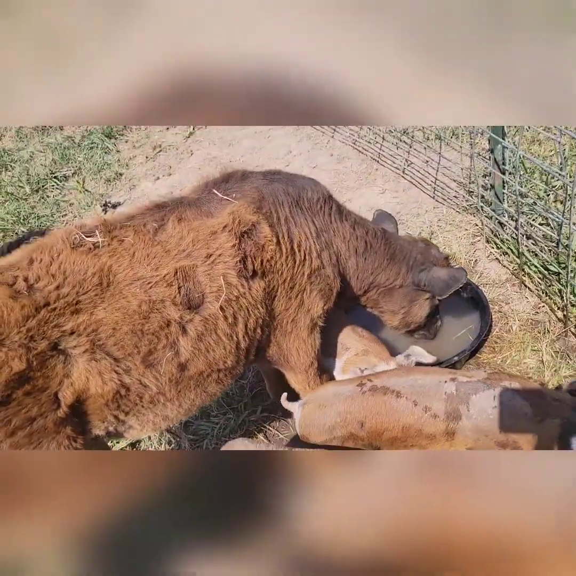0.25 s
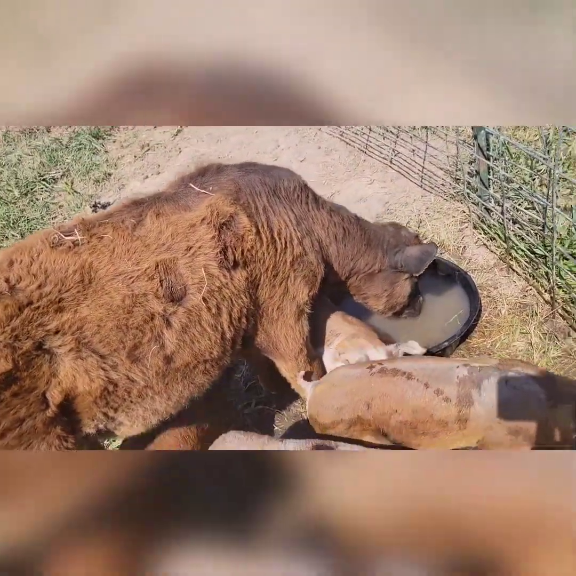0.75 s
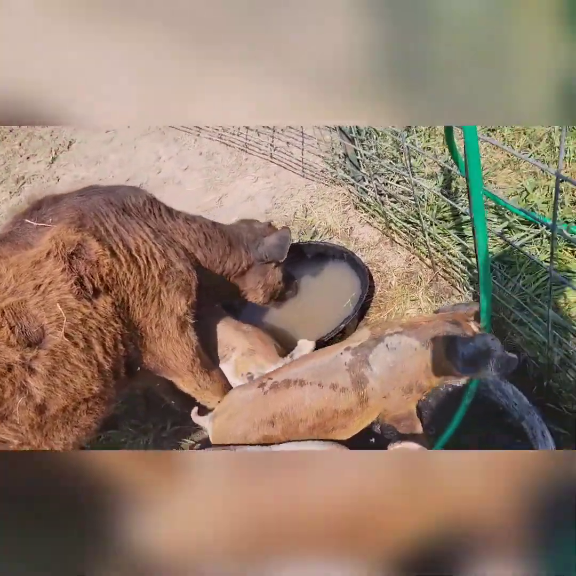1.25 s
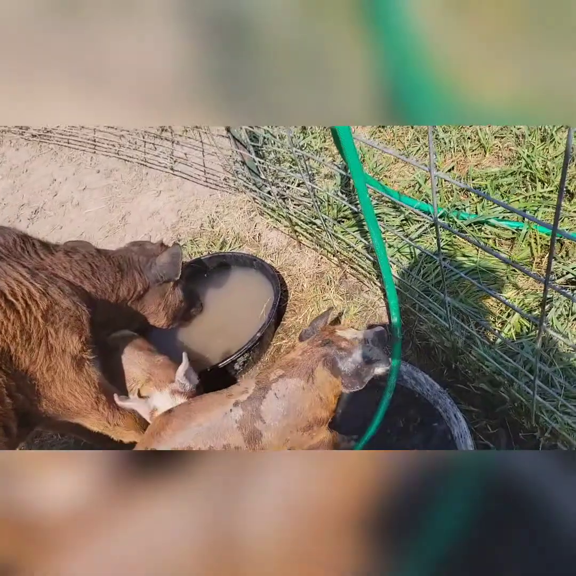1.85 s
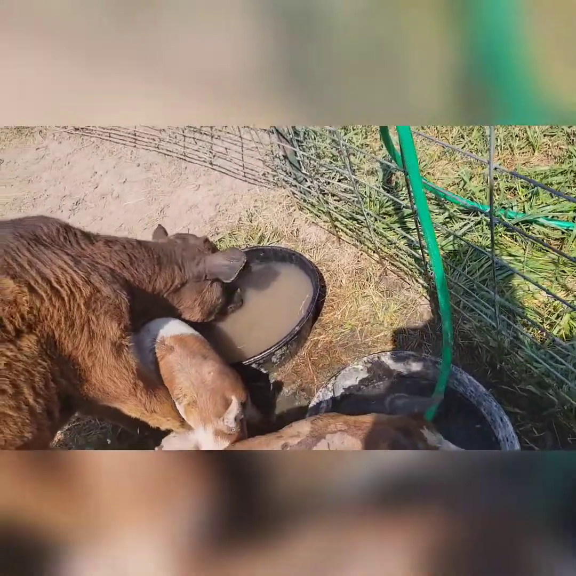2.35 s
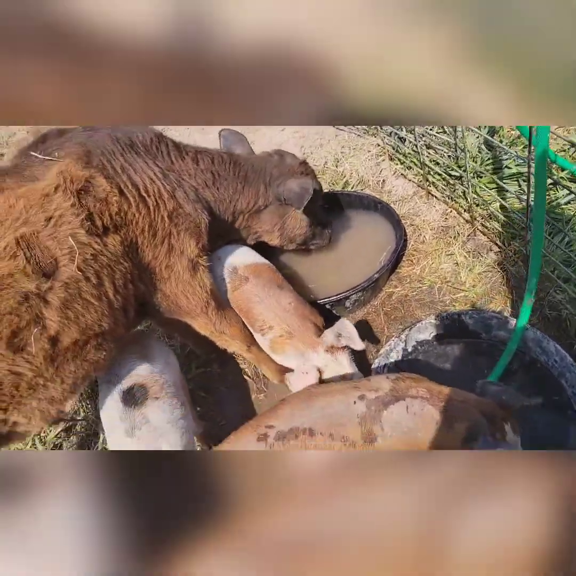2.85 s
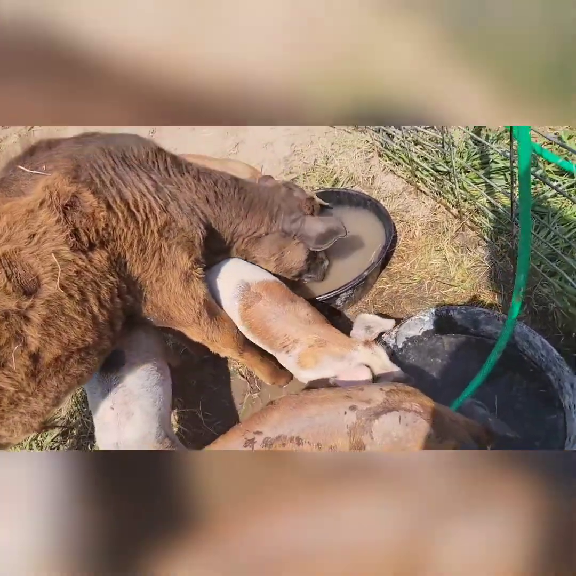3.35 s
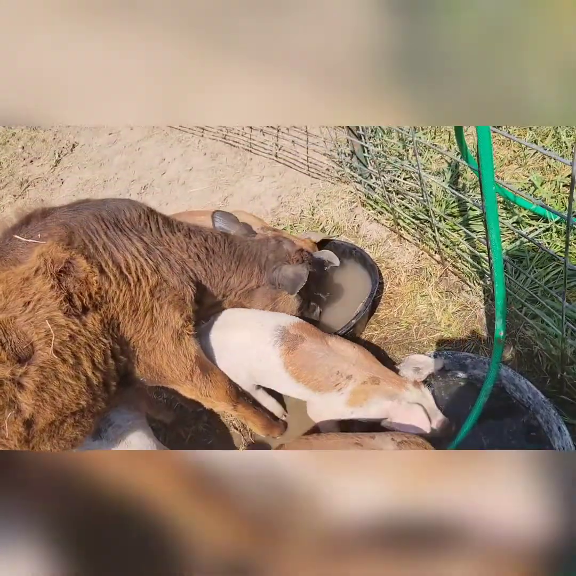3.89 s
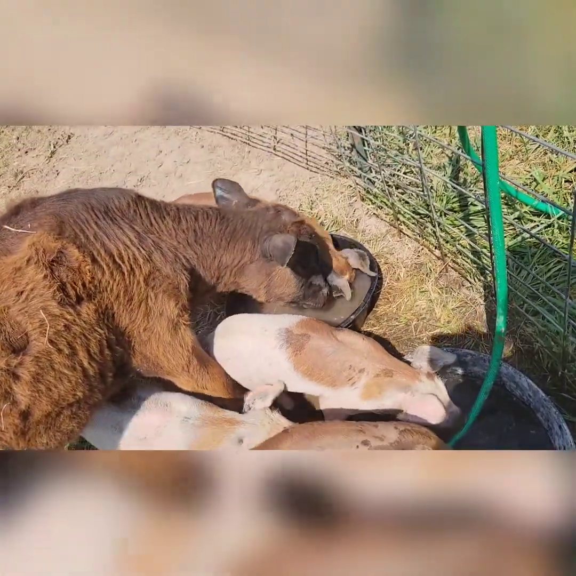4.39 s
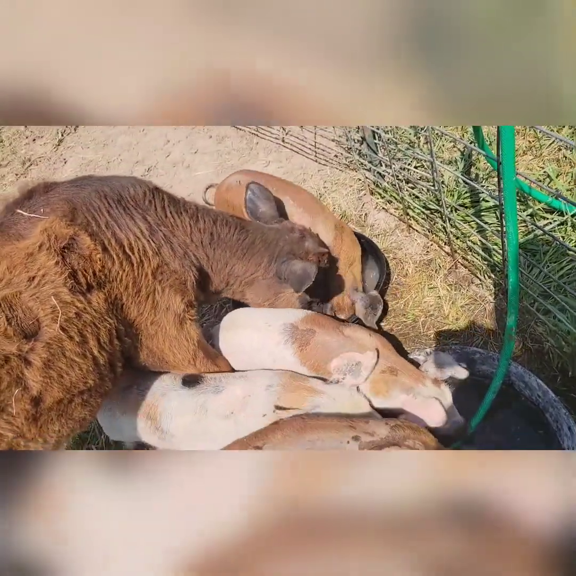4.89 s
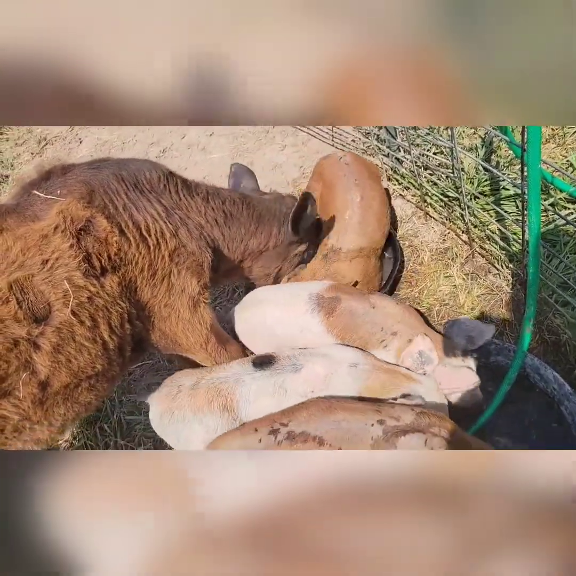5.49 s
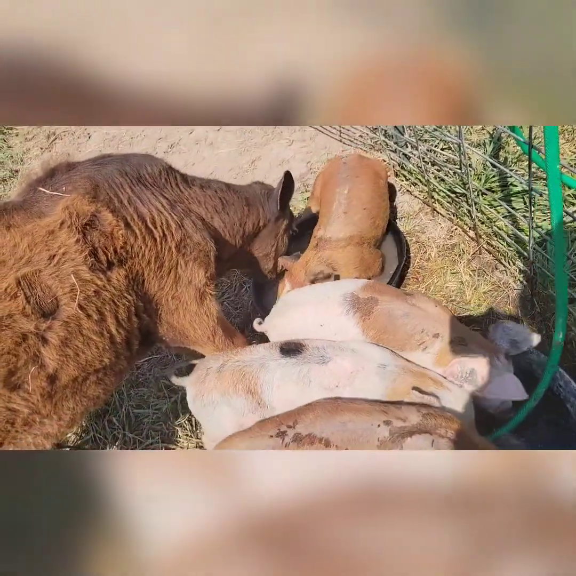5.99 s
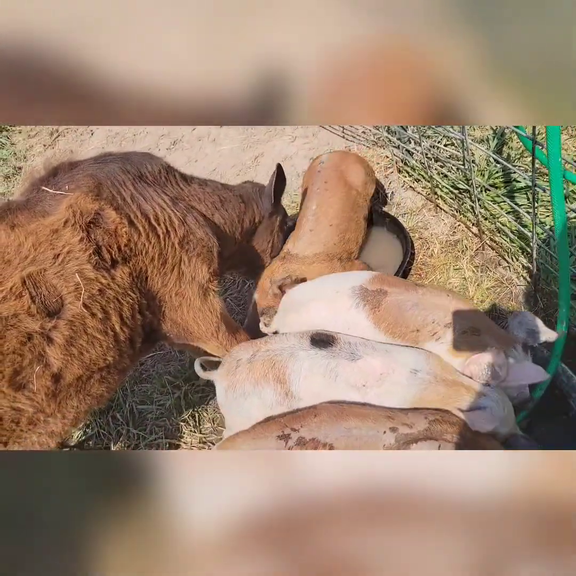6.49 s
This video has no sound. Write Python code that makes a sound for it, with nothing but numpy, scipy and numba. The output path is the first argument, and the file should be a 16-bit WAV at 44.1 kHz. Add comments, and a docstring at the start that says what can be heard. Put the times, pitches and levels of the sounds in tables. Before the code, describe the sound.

Close by in an outdoor yard, a calf and piglets drink from a shallow pan. Quiet, uneven laps, plops and small splashes come in clusters, with two long, soft sips in the first half and gulps after the middle. Hides rub and dry straw snaps throughout, and a piglet gives a few faint, short grunts. Behind them are faint crickets, a distant bird early on and a little wind on the hand-held microphone.

```python
"""In a yard, a calf and piglets drink from a shallow pan, a metre or two below a hand-held phone.
Tongues ring air cavities as plops, closing pockets glide up as glugs, and water sloshes and bubbles;
the calf's sips are noise shaped by the resonances of its mouth. Hides rub, hooves snap dry straw and
a piglet grunts in slow glottal pulses. Behind them crickets chirp, a bird calls far off, bodies shift
on the ground and wind rumbles on the two microphone ports."""
import sys
import numpy as np
from scipy import signal
from scipy.fft import rfft, irfft, next_fast_len
from scipy.io import wavfile
from scipy.ndimage import uniform_filter1d
from numba import njit

SR = 44100
rng = np.random.default_rng(int(sys.argv[2]) if len(sys.argv) > 2 else 0)


def to_wav(sig):
    """Store sig (one row per channel, or 1-D mono) as 16-bit WAV at the path in sys.argv[1].

    Samples outside -1..1 are clipped; the rate is SR.
    """
    pcm = np.clip(np.atleast_2d(sig), -1, 1) * 32767
    pcm = np.round(pcm).astype(np.int16)
    wavfile.write(sys.argv[1], SR, pcm.T)  # frames by channels


N = 297234


def undb(db):
    return 10 ** (np.asarray(db) / 20)


def unit(x):
    return x / np.sqrt(np.mean(x ** 2))


def curve(rows):
    """Linear interpolation of (time_s, level_db) rows at every sample."""
    return np.interp(np.arange(N) / SR, *np.transpose(rows))


@njit
def svf(x, hz, width):
    """State-variable band-pass with moving centre and width, gain 1 at the centre."""
    y, band_state, low_state = np.empty(len(x)), 0., 0.
    for i in range(len(x)):
        centre = hz[i % len(hz)]
        gain, damping = np.tan(np.pi * centre / SR), width[i % len(width)] / centre
        passed = (band_state + gain * (x[i] - low_state)) / (1 + gain * (gain + damping))
        band_state = 2 * passed - band_state
        low_state += 2 * gain * passed
        y[i] = damping * passed
    return y


def band(x, hz, width):
    return svf(x, 1. * np.atleast_1d(hz), 1. * np.atleast_1d(width))


def steep_band(x, hz, width):
    return band(band(x, hz, width), hz, width)


def walk(rate_hz, size=N):
    """Random modulation: levels held for 1 / rate_hz and smoothed twice, with a spread near 1."""
    hold = int(SR / rate_hz)
    steps = np.repeat(rng.standard_normal(N // hold + 1), hold)
    return 1.6 * uniform_filter1d(uniform_filter1d(steps, hold), hold)[:size]


def add(out, start_s, x, pan_db=0., lag_s=0.):
    """Stereo placement by level and time difference: pan_db and lag_s are left minus right."""
    for channel, at_s, db in ((0, start_s + lag_s, pan_db / 2), (1, start_s, -pan_db / 2)):
        i = max(int(at_s * SR), 0)
        out[channel, i:i + len(x)] += undb(db) * x[:N - i]


def bed(colour, level_db, coherence, flicker_db, flicker_hz, pan_db):
    """Coloured stereo noise whose half-octave bands follow one level and flicker independently."""
    hz, db = np.transpose(colour)
    size = next_fast_len(N)
    octave = np.log2(np.arange(size // 2 + 1) * SR / size + 1e-3)
    spectrum = undb(np.interp(octave, np.log2(hz), db, -150, -150))
    mid, side = rfft(rng.standard_normal((2, size))) * spectrum
    pair = np.sqrt(1 + coherence) * mid + np.sqrt(1 - coherence) * side * np.array([[1], [-1]])
    out = 0
    for centre in np.arange(np.log2(hz[0]), np.log2(hz[-1]) + .5, .5):
        band_gain = np.clip(1 - 2 * np.abs(octave - centre), 0, 1)
        out = out + undb(flicker_db * walk(flicker_hz)) * irfft(pair * band_gain, size)[:, :N]
    return unit(out) * undb(level_db + np.array([[pan_db], [-pan_db]]) / 2)


def decay(t, t60_s, attack_s):
    """Exponential damping, 60 dB in t60_s, with a rounded onset."""
    return np.exp(-np.log(1000) * t / t60_s) * (1 - np.exp(-t / attack_s))


def bubble(hz, ring_s, rise):
    """Cavity resonance: a damped sine whose pitch climbs as the cavity shrinks."""
    t = np.arange(int(ring_s * SR) + 8) / SR
    return np.sin(2 * np.pi * hz * t * (1 + rise * t / ring_s)) * decay(t, ring_s, attack_s=.0008)


def whistle(hz, db, waver_db):
    """Frequency modulation: a sine follows a pitch track, unsteady in level, with 2.4 ms fades."""
    t = np.arange(len(hz)) / SR
    fade = np.clip(np.minimum(t, t[-1] - t) / 0.0024, 0, 1)
    gain = undb(db + waver_db * walk(314, len(t)))
    return np.sqrt(2) * fade * gain * np.sin(2 * np.pi * np.cumsum(hz) / SR)


# Gusts: time_s, level_db
WIND_LEVEL = [(0.0, -73), (0.05, -59.5), (1.71, -60.5), (1.8, -65), (1.84, -45), (1.91, -61), (2.05, -36),
              (2.1, -51), (2.46, -63), (2.55, -49.5), (2.68, -70), (2.83, -50), (3.1, -66), (3.42, -64),
              (4.47, -71), (4.51, -62), (4.58, -69), (6.44, -68.5), (6.48, -59), (6.74, -72)]
# Wind spectrum: frequency_hz, density_db
WIND_SPECTRUM = [(13, -30), (22, -8), (70, 3), (88, -8.5), (120, -9.5), (160, -58), (260, -120)]


def wind():
    """Turbulence at the ports makes low noise, only partly coherent between the two."""
    return bed(WIND_SPECTRUM, curve(WIND_LEVEL), 0.31, flicker_db=0.48, flicker_hz=13, pan_db=0.028)


# Heavy bodies shifting: time_s, level_db
RUMBLE_LEVEL = [(0.0, -84), (0.04, -67.5), (1.33, -63.5), (1.41, -47.5), (1.46, -65.5), (1.82, -66),
                (2.01, -52), (2.38, -66), (3.23, -63), (3.34, -55), (4.45, -69), (4.51, -54), (4.62, -68),
                (5.14, -60.5), (6.21, -66.5), (6.25, -70), (6.49, -55), (6.74, -56.5)]
# Ground rumble spectrum: frequency_hz, density_db
RUMBLE_SPECTRUM = [(80, 12), (110, 1.5), (200, 0.5), (300, 0)]


def ground_rumble():
    """Weight shifting on the ground radiates long waves that reach both ports in phase."""
    return bed(RUMBLE_SPECTRUM, curve(RUMBLE_LEVEL), 1.0, flicker_db=0.54, flicker_hz=8.3, pan_db=-0.1)


# Two crickets: pitch_hz, level_db, first_chirp_s, period_s, scatter_s
CRICKETS = [(9280, -61.5, .115, .1695, .014), (9560, -61.5, .137, .197, .014)]
CHIRP_S, STROKES_HZ, STROKE_DEPTH = .075, 126, .55


def crickets(count=48):
    """Stridulation: wing strokes modulate a narrow band of noise; each cricket keeps its own beat."""
    out, t = np.zeros((2, N)), np.arange(int(CHIRP_S * SR)) / SR
    swell = np.sqrt(np.sin(np.pi * t / CHIRP_S))
    for hz, db, first_s, period_s, scatter_s in CRICKETS:
        for k, (late, loud, quick) in enumerate(rng.standard_normal((count, 3))):
            centre_s = first_s + period_s * k + scatter_s * late
            strokes = 1 - STROKE_DEPTH * np.cos(np.pi * STROKES_HZ * (1 + .05 * quick) * t) ** 2
            tone = unit(steep_band(rng.standard_normal(len(t)), hz, width=450))
            if centre_s < N / SR:
                add(out, centre_s - CHIRP_S / 2, undb(db + 3.4 * loud) * strokes * swell * tone)
    return out


# Distant bird notes: start_s, length_s, first_hz, last_hz, onset_offset_hz, level_db
BIRD_NOTES = [(0.008, 0.022, 6830, 6660, 2, -49.5), (0.147, 0.027, 6740, 6740, -3, -50),
              (0.208, 0.018, 7050, 6850, 2, -63), (2.079, 0.057, 5330, 4800, 478, -51),
              (2.389, 0.1, 6320, 4360, 2, -55), (2.689, 0.093, 6190, 4520, -7, -53),
              (2.8, 0.031, 6300, 7150, -11, -58), (2.934, 0.039, 4120, 4080, 700, -61),
              (3.072, 0.057, 4560, 5520, 1600, -49.5), (3.2, 0.042, 3950, 4220, 9, -63.5),
              (3.231, 0.058, 4550, 5500, 1515, -55), (3.395, 0.044, 4600, 5350, -5, -52),
              (3.525, 0.061, 3970, 4720, -7, -62)]
# Reflections of each note: delay_s, gain_db
BIRD_ECHOES = [(.009, -13), (.021, -16), (.036, -19)]
HOOK_S = 0.00616  # time constant of the onset offset
PLUNGE_AT, PLUNGE_WIDTH = .68, .14  # shares of a falling note's length


def bird():
    """Thin tones glide up, or dwell and plunge; reflections follow as weaker, delayed copies."""
    out = np.zeros((2, N))
    for start_s, length_s, first_hz, last_hz, hook_hz, db in BIRD_NOTES:
        u = np.linspace(0, 1, int(length_s * SR))
        plunge = .25 * u + .75 * (1 + np.tanh((u - PLUNGE_AT) / PLUNGE_WIDTH)) / 2
        slide = np.sin(np.pi / 2 * u ** 1.2) ** 2 if last_hz > first_hz else plunge
        hz = first_hz + (last_hz - first_hz) * slide + hook_hz * np.exp(-u * length_s / HOOK_S)
        hz *= 1 + .006 * walk(400, len(u))
        note = np.sin(np.pi * u).clip(0) ** 0.2 * whistle(hz, db, waver_db=1.5)
        add(out, start_s, note, pan_db=.8, lag_s=-.0007)
        for delay_s, echo_db in BIRD_ECHOES:
            add(out, start_s + delay_s, undb(echo_db) * note, lag_s=.0003)
    return out


# Hides and dry grass rubbing: time_s, treble_level_db
RUB_LEVEL = [(0.0, -58.5), (0.09, -53.5), (0.26, -62), (0.336, -49), (0.49, -49), (0.53, -57.5),
             (0.72, -59), (0.764, -51), (0.83, -60), (0.88, -46.5), (0.93, -55), (1.0, -49.5), (1.086, -59),
             (1.23, -51.5), (1.31, -51.5), (1.39, -59.5), (1.6, -54), (1.75, -51.5), (2.1, -50),
             (2.15, -42), (2.2, -43.5), (2.33, -54.5), (2.52, -44.5), (2.65, -52.5), (2.89, -60),
             (3.01, -52.5), (3.08, -61), (3.2, -59.5), (3.31, -52.5), (3.47, -63.5), (3.65, -53),
             (3.76, -56.5), (3.86, -58.5), (3.92, -54.5), (4.0, -58.5), (4.2, -58), (4.57, -59.5),
             (4.685, -54.5), (4.83, -59.5), (5.06, -55.5), (5.28, -59), (5.44, -49), (5.6, -58.5),
             (5.72, -54), (5.87, -55), (5.93, -63), (6.04, -63), (6.1, -64.5), (6.29, -56.5), (6.39, -59),
             (6.47, -56), (6.6, -54), (6.74, -54)]
# Bright rustling hiss, coloured by the microphone's resonance near 13 kHz: frequency_hz, density_db
HISS_SPECTRUM = [(5760, -16), (9800, -7.5), (10800, -4), (12100, 3.5), (13400, 5.5), (15200, 2),
                 (16200, -24)]
# Broad body of the rustle: frequency_hz, density_db
BODY_SPECTRUM = [(940, -9), (1600, -1), (2510, 1.5), (3130, 0.5), (3760, 0.5), (4600, 1), (11000, -2),
                 (14300, -57), (22000, -120)]


def rustle():
    """Microphone resonance colours a bright hiss that follows the rubbing; the body follows in part."""
    rub_db = curve(RUB_LEVEL)
    body_db = -59.3 + 0.4 * (rub_db - np.mean(rub_db))
    hiss = bed(HISS_SPECTRUM, rub_db, coherence=.6, flicker_db=1.2, flicker_hz=25, pan_db=-8.0)
    body = bed(BODY_SPECTRUM, body_db, coherence=0.3, flicker_db=2.4, flicker_hz=22, pan_db=0.2)
    return hiss + body


def stalk_crackle(count=500):
    """Brittle fracture: stalks snap at random under the rubbing bodies, each a narrow-band click."""
    out, rub_db, t = np.zeros((2, N)), curve(RUB_LEVEL), np.arange(256) / SR
    envelope = t / .001 * np.exp(-t / .001)
    for when, pitch, size, place in rng.random((count, 4)):
        hz = 3500 * 4.0 ** pitch
        click = unit(steep_band(rng.standard_normal(len(t)), hz, .2 * hz)) * envelope
        db = rub_db[int(when * N)] - 7.0 + 9.0 * size ** 3
        add(out, when * N / SR, undb(db) * click, 10.0 * (place - .7), 0.00044 * (place - .4))
    return out


# Straw snaps and spray hits: start_s, mid_level_db, top_relative_db, low_relative_db
TICKS = [(.221, -45, 14, -17), (0.499, -48, 6, -15), (.561, -54, 12, -20), (0.85, -52, 17, -8),
         (.858, -48, 0, 2), (.879, -42, 5, -10), (1.025, -37, -9, -20), (1.418, -54, 12, -8),
         (1.613, -51, 15, -13), (1.73, -46.5, 11.5, -18), (1.833, -43, -6, -12), (1.847, -52, 9, -10),
         (1.857, -45.5, -10, 3), (1.885, -44, -8, -8), (1.894, -42.5, -8, -9), (1.948, -50, -8, -3),
         (1.982, -47, 4, -8), (2.001, -37, -8, -9), (2.011, -43, 5, -11), (2.019, -42, -8, -10),
         (2.135, -44, -2, -18), (2.141, -25, 2.5, -8), (2.144, -39, 16, -25), (2.168, -36, -10, -9),
         (2.182, -33, -2, -8), (2.205, -40, -6, -15), (2.229, -42, 6, -12), (2.27, -42, -7, 0),
         (2.396, -46, 12, -30), (3.359, -42, 8, -8), (3.628, -45.5, 2, -2), (3.79, -49, 19.5, 12),
         (3.795, -50.5, 16, 18.5), (3.816, -53, 2, -7), (3.836, -50, 6, 0), (3.881, -50, -5, -5),
         (3.923, -47, 6, -20), (4.131, -49.5, 2, -6), (4.36, -49, 10, -15), (4.394, -35, 5.5, -1),
         (4.503, -45, 5, -6), (4.535, -53, 11, 0), (4.745, -38.5, 6, -22), (4.787, -42, 8, -1.5),
         (5.519, -41, 4, -8), (5.853, -39, 0, -25), (5.876, -41, 6, -4), (5.938, -44, -4, -6),
         (5.956, -48, 10, -20), (6.019, -44, -9, -13), (6.103, -57, 5, -8), (6.144, -51, 5, -3),
         (6.29, -47, 5, -18), (6.404, -39, 0, -10), (6.42, -34.5, 11.5, -1.5), (6.488, -46.5, -7, -6),
         (6.646, -41.5, 5, -1), (6.68, -44, 1, -3), (6.718, -46, 6, 2)]


def ticks():
    """Impulsive excitation: hooves snap straw and spray hits the rim, in three bands of damped noise."""
    out, t = np.zeros((2, N)), np.arange(3072) / SR
    for start_s, db, top_db, low_db in TICKS:
        noise = rng.standard_normal((3, len(t)))
        envelope = undb(db) * decay(t, t60_s=.024, attack_s=.0008)
        top = undb(top_db) * unit(steep_band(noise[0], 12740, 6000))
        mid = unit(steep_band(noise[1], 7300, 4500))
        low = undb(low_db) * unit(band(noise[2], 3420, 2500))
        add(out, start_s, envelope * top, pan_db=-8.0, lag_s=.00007)
        add(out, start_s, envelope * (mid + low), pan_db=-1.5, lag_s=.00002)
    return out


# Piglet grunts: start_s, length_s, throat_hz, level_db
GRUNTS = [(1.332, 0.11, 318, -43.5), (5.417, 0.036, 298, -46.5), (6.472, 0.12, 202, -50)]
GLOTTAL_HZ, THROAT_SAG = 43.6, 0.13  # the sag is a share of the throat frequency


def grunts():
    """Source and filter: slow, uneven glottal pulses ring the throat, whose resonance sags."""
    out = np.zeros((2, N))
    for start_s, length_s, throat_hz, db in GRUNTS:
        u = np.linspace(0, 1, int(length_s * SR))
        hz = throat_hz * (1 - THROAT_SAG * u)
        cycles = np.cumsum(GLOTTAL_HZ * (1 + 0.204 * walk(56.5, len(u)))) / SR
        pulses = np.diff(np.floor(cycles + 0.666), prepend=0)
        breath = 0.04 * rng.standard_normal(len(u))
        voice = band(band(pulses + breath, hz, 71), hz, 140)
        add(out, start_s, unit(voice) * np.sin(np.pi * u) * undb(db), pan_db=-3.5)
    return out


# Water moving in the pan: time_s, level_db
SLOSH_LEVEL = [(0.0, -63), (1.29, -58.5), (1.71, -62.5), (3.75, -61.5), (4.02, -55), (4.9, -63),
               (5.11, -61), (5.25, -56), (5.8, -59), (6.14, -61.5), (6.63, -53.5), (6.74, -57.5)]
# Slosh spectrum: frequency_hz, density_db
SLOSH_SPECTRUM = [(110, -44), (190, -6), (483, 2.5), (727, -6), (1100, -4.5), (1240, -5.5), (1770, -15.5),
                  (2200, -20), (2860, -89), (4840, -120)]


def slosh():
    """Agitated water radiates flickering noise, almost incoherent between the ports."""
    return bed(SLOSH_SPECTRUM, curve(SLOSH_LEVEL), 0.011, flicker_db=2.1, flicker_hz=14, pan_db=-3.5)


def gurgle(count=1200):
    """Constant-Q resonance: small bubbles ring equally many cycles, louder while the water moves."""
    out, slosh_db = np.zeros((2, N)), curve(SLOSH_LEVEL)
    for when, pitch, size, place in rng.random((count, 4)):
        hz = 260 * 22.0 ** pitch
        db = slosh_db[int(when * N)] + 0.5 + 12.8 * size ** 3
        ping = undb(db) * bubble(hz, ring_s=28.3 / hz, rise=0.45)
        add(out, when * N / SR, ping, 10.0 * (place - .6), 0.00068 * (place - .3))
    return out


# The calf's long sips: start_s, length_s, level_db
SIPS = [(0.301, 0.52, -55.5), (2.341, 0.773, -51)]
# Resonances of the nearly closed mouth: centre_hz, width_hz, gain_db
MOUTH_FORMANTS = [(1990, 330, 1), (2450, 400, -4), (2980, 600, -4)]
FORMANT_SAG = 0.089  # share by which the resonances sink


def sips():
    """Formant filtering: air drawn through narrow lips hisses through slowly sinking resonances."""
    out = np.zeros((2, N))
    for start_s, length_s, db in SIPS:
        size = int(length_s * SR)
        air = rng.standard_normal(size) * undb(1.5 * walk(39.6, size))
        sag = np.linspace(1, 1 - FORMANT_SAG, size) * (1 + .015 * walk(12, size))
        hiss = sum(undb(gain_db) * unit(steep_band(air, hz * sag, width))
                   for hz, width, gain_db in MOUTH_FORMANTS)
        swell = np.sin(np.linspace(0, np.pi, size)).clip(0) ** 0.41
        add(out, start_s, undb(db) * hiss * swell, pan_db=0.5, lag_s=-.0002)
    return out


# Water sucked past the lips: start_s, length_s, level_db, first_hz, last_hz, width_hz
SLURPS = [(0.878, 0.022, -43, 520, 422, 250), (0.849, 0.034, -49.5, 1600, 1900, 2000),
          (0.948, 0.14, -56, 2660, 2900, 600), (1.869, 0.2, -52.5, 2200, 1200, 2600),
          (2.149, 0.096, -62, 1820, 2200, 2500), (2.852, 0.084, -54.5, 3130, 2830, 660),
          (3.492, 0.042, -55, 3140, 2970, 596), (4.122, 0.079, -49.5, 1170, 1090, 396),
          (4.524, 0.027, -49.5, 1400, 1500, 700), (4.552, 0.042, -48.5, 1500, 1880, 600),
          (5.203, 0.1, -61, 980, 1410, 810), (5.631, 0.024, -56.5, 1300, 1500, 1400),
          (5.687, 0.22, -57.5, 780, 2080, 1230), (6.022, 0.04, -56, 1120, 900, 900),
          (6.324, .045, -58.5, 4000, 4160, 500), (6.599, 0.23, -60, 1920, 2106, 1800)]


def slurps():
    """Shot noise: a dense crackle of breaking films excites the resonance of the moving mouth."""
    out = np.zeros((2, N))
    for start_s, length_s, db, first_hz, last_hz, width in SLURPS:
        size = int(length_s * SR)
        bursts = (rng.random(size) < .035) * rng.standard_normal(size)
        hiss = .06 * rng.standard_normal(size)
        wet = unit(steep_band(bursts + hiss, np.linspace(first_hz, last_hz, size), width))
        swell = np.sqrt(np.sin(np.linspace(0, np.pi, size)).clip(0))
        add(out, start_s, wet * swell * undb(db + 3.7 * walk(114.6, size)), pan_db=-2.0, lag_s=.0001)
    return out


# Air pockets closing in the mouths: start_s, length_s, first_hz, last_hz, level_db
GLUGS = [(0.591, 0.039, 1113, 1460, -53), (0.625, 0.02, 1850, 2670, -46), (3.235, 0.038, 760, 1810, -42.5),
         (3.615, 0.047, 792, 2150, -58), (4.813, 0.023, 1150, 1910, -56), (3.655, 0.048, 277, 865, -47.5),
         (3.967, 0.038, 489, 786, -47.5), (4.027, 0.025, 513, 795, -48.5), (4.501, 0.068, 139, 884, -47),
         (3.055, 0.023, 2058, 2763, -38), (3.808, 0.028, 990, 1730, -36), (4.564, 0.031, 758, 1338, -36),
         (4.904, 0.023, 968, 1260, -46), (5.145, 0.018, 1000, 1240, -45.5)]
GLUG_PEAK_AT, GLUG_FALL_DB = 0.13, 9.5  # share of the length; fall from peak to end


def glugs():
    """A shrinking air pocket stiffens, so its resonance climbs as the tone swells and dies away."""
    out = np.zeros((2, N))
    for start_s, length_s, first_hz, last_hz, db in GLUGS:
        u = np.linspace(0, 1, int(length_s * SR))
        hz = first_hz * (last_hz / first_hz) ** u
        swell_db = -GLUG_FALL_DB * np.abs(u - GLUG_PEAK_AT) / (1 - GLUG_PEAK_AT)
        add(out, start_s, whistle(hz, db + swell_db, waver_db=2.2), pan_db=-1.5, lag_s=.00015)
    return out


# Short pings of droplets, lip smacks and the ringing parts of snaps and gulps: start_s, level_db, pitch_hz
PINGS = [(.117, -48, 1850), (.146, -45, 3420), (.212, -48, 2490), (0.684, -39, 2970), (.694, -46, 1800),
         (.851, -41, 1140), (.867, -43, 3970), (.892, -45, 4300), (.996, -31.5, 1450), (1.808, -48, 2190),
         (1.885, -46, 2910), (1.921, -39.5, 4300), (1.957, -41, 3640), (1.977, -40, 3020),
         (2.002, -40, 5760), (2.156, -41, 2220), (2.199, -47, 2320), (2.272, -47, 1400), (3.795, -29, 3600),
         (3.795, -31, 2570), (3.856, -54, 3500), (3.882, -47, 3200), (3.905, -45.5, 2830),
         (4.035, -50, 1290), (4.13, -44, 2780), (4.154, -47, 2000), (4.178, -51, 3380), (4.502, -44, 4600),
         (4.503, -48, 3500), (4.53, -47, 3950), (4.546, -45, 2780), (4.501, -30.5, 1820),
         (4.562, -35, 1250), (4.568, -31, 750), (4.572, -44, 1930), (4.58, -51, 3040), (4.635, -46, 1800),
         (5.001, -49, 3430), (5.054, -47, 3800), (5.181, -51, 4140), (5.207, -48, 3180), (5.225, -51, 3350),
         (5.254, -44, 1770), (5.294, -49, 1870), (5.315, -49, 2230), (5.366, -52, 3250), (5.414, -52, 2900),
         (5.456, -47, 3880), (5.481, -49, 1380), (5.505, -52, 2880), (5.408, -59, 605), (5.575, -55, 1000),
         (5.64, -53, 1720), (5.643, -54, 1060), (5.687, -60, 606), (5.712, -64, 1300), (5.763, -53, 1140),
         (5.877, -45, 2250), (5.889, -42, 665), (5.735, -50, 2280), (5.75, -55, 2480), (5.822, -49, 1620),
         (5.849, -46, 1360), (5.897, -35, 4830), (5.898, -36, 5700), (6.023, -49, 2300), (6.144, -50, 1770),
         (6.03, -51, 2300), (6.455, -45, 604), (6.55, -41, 2820), (6.646, -40, 2780), (6.699, -39, 2430),
         (6.455, -47.5, 3500), (6.487, -46, 3320), (6.52, -39.5, 3300), (6.541, -40.5, 1820),
         (6.643, -48, 1550), (6.721, -54, 4070)]
PING_RING_S = .022  # at 1 kHz


def pings():
    """Damped free oscillation: each ping is one brief mode, and higher pings die sooner."""
    out = np.zeros((2, N))
    for start_s, db, hz in PINGS:
        ping = bubble(hz, PING_RING_S * (1000 / hz) ** 0.3, rise=.03)
        add(out, start_s, undb(db + 4.0) * ping, pan_db=-1.0, lag_s=.00003)
    return out


def spray(count=14):
    """Superposition: droplets of many sizes merge into a fading cloud over the hiss of fine mist."""
    t = np.arange(4096) / SR
    cloud = np.zeros(len(t))
    for when, pitch, size in rng.random((count, 3)):
        hz = 800 * 2 ** (2.6 * pitch)  # spread over 2.6 octaves
        drop = undb(12.0 * size) * bubble(hz, ring_s=69.0 / hz, rise=0.5)
        i = int(when * 0.034 * SR)
        cloud[i:i + len(drop)] += drop[:len(t) - i]
    mist = unit(band(band(rng.standard_normal(len(t)), 950, 6700), 2000, 7700))
    return decay(t, t60_s=0.081, attack_s=0.0012) * (cloud / cloud[:1500].std() + undb(-4) * mist)


# Tongue and muzzle breaking the surface: start_s, level_db, pitch_hz, pan_db, spray_db
PLOPS = [(0.08, -50, 720, -9, 5), (0.117, -44.5, 525, -8, -2), (0.142, -43, 1240, 1, -11),
         (0.208, -44, 587, -4, 1.5), (0.229, -36, 1680, 5, -20), (0.685, -36.5, 3700, -4, -10),
         (0.851, -29, 3070, 2, -12), (0.877, -22.5, 1510, -4.5, -7), (0.878, -31, 470, -8, -7),
         (0.884, -35.5, 1010, -7, -20), (0.996, -28, 1020, -7, -28), (1.494, -37, 1300, 1, -9),
         (1.509, -45, 1210, 16, -1), (1.853, -35, 3280, 0, -15), (1.886, -48, 1380, 9, 8),
         (1.935, -44.5, 1910, 4, 15.5), (1.969, -29, 1690, 1, -2), (2.01, -40.5, 2030, -4, 12),
         (2.039, -34.5, 1732, 2, -3), (2.1, -27, 2740, 9.5, -16), (2.137, -25.5, 755, -2, -1),
         (2.141, -35, 930, 4, 6), (2.144, -32.5, 360, -8, -20), (2.163, -44, 686, -17, 5),
         (2.214, -42, 1522, -4, -4), (2.269, -28.5, 2550, 10.5, -12.5), (2.624, -34.5, 3700, -2.5, -7),
         (3.027, -41.5, 2330, 17, -5), (3.058, -36, 2260, 11, -22), (3.795, -32, 910, 5, 4.5),
         (3.808, -29, 1160, 15, -10), (3.855, -45, 1620, 9, 3.5), (3.866, -41.5, 1660, -23, -12),
         (3.879, -37, 1040, 3, 3), (4.008, -42.5, 327, -5, -2), (4.065, -37, 1230, -5, -22),
         (4.132, -44, 410, -2, -1), (4.397, -34.5, 1139, 1, -3), (4.501, -22, 1165, 0, -3.5),
         (4.53, -30.5, 1320, 0, -1), (4.575, -20, 1130, 0, -31), (4.908, -37.5, 990, -5, -12),
         (5.146, -35.5, 1050, -7, -23), (5.218, -40, 885, 1.5, 0), (5.235, -38, 437, -5, -4),
         (5.251, -32.5, 1105, -1.5, -18), (5.297, -43, 358, -3, -0.5), (5.382, -52.5, 2920, -30, -19),
         (5.564, -42.5, 1070, -4, -17), (5.645, -55, 506, -10, 1), (5.7, -41.5, 313, -4, -3),
         (5.758, -50.5, 1170, -15, 4), (5.833, -30.5, 1700, -1.5, -6.5), (5.878, -43, 860, -12, 3.5),
         (5.895, -32, 2170, -9.5, -11), (5.931, -42.5, 505, -10, -23), (6.025, -50.5, 466, -13, 7.5),
         (6.408, -32, 2340, -5, -5.5), (6.424, -41, 320.7, -3, -5), (6.517, -52, 302.7, -11, -7),
         (6.541, -35.5, 2750, 7.5, -2), (6.64, -45.5, 2770, -15, 3.5), (6.695, -40.5, 2190, 16, 3.5)]
PLOP_RING_S, PLOP_SHORTEST_S = 0.021, .018  # ring time at 1 kHz; its lower limit
OVERTONE_RATIO, OVERTONE_DB = 1.298, -11.5


def plops():
    """Cavity resonance: each lap rings two modes and throws spray; lower cavities ring longer."""
    out = np.zeros((2, N))
    for start_s, db, hz, pan_db, spray_db in PLOPS:
        ring_s = max(PLOP_RING_S * (1000 / hz) ** 0.49, PLOP_SHORTEST_S)
        fundamental = bubble(hz, ring_s, rise=0.067)
        overtone = undb(OVERTONE_DB) * bubble(OVERTONE_RATIO * hz, ring_s, rise=0.079)
        add(out, start_s, undb(db + 4.0) * (fundamental + overtone), pan_db, lag_s=.00019)
        add(out, start_s - .001, undb(db + spray_db - 9.5) * spray(), pan_db, lag_s=.00005)
    return out


def scene():
    """Linear superposition: the pressures of all sources add at each port."""
    background = wind() + ground_rumble() + crickets() + bird()
    animals = rustle() + stalk_crackle() + ticks() + grunts()
    drinking = slosh() + gurgle() + sips() + slurps() + glugs() + pings() + plops()
    return background + animals + drinking


def record(dry):
    """Band limiting: the phone cuts the top with a steep elliptic low-pass."""
    cutoff_hz = 15900
    return signal.sosfilt(signal.ellip(8, .2, 70, cutoff_hz, fs=SR, output="sos"), dry)


dry = scene()
out = record(dry)
to_wav(out)
```